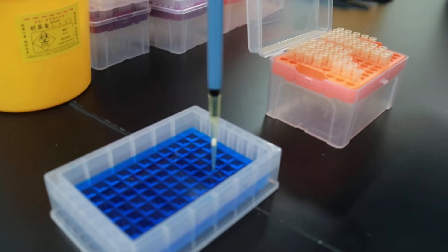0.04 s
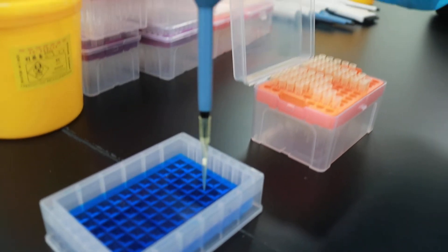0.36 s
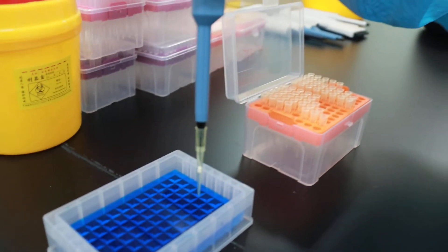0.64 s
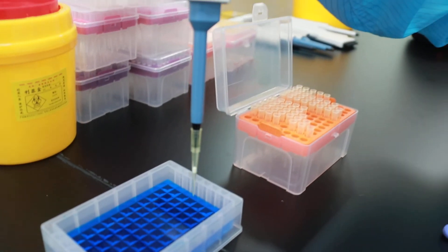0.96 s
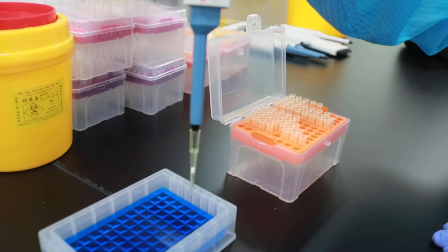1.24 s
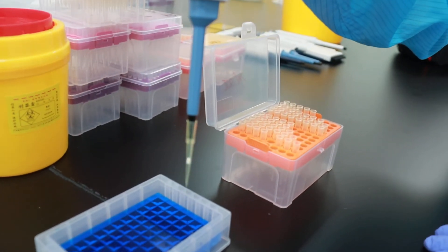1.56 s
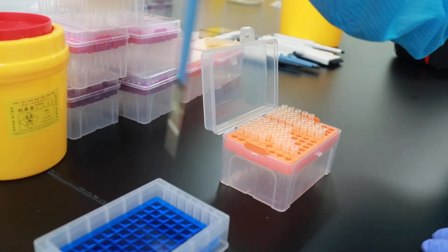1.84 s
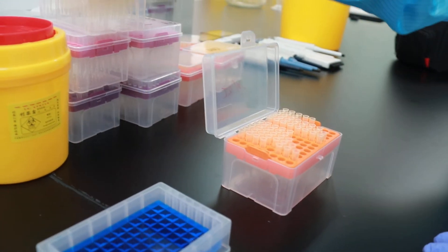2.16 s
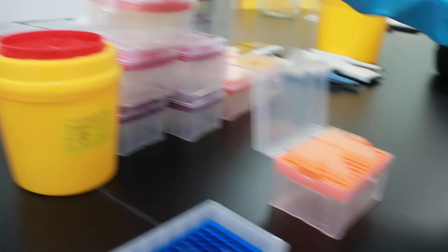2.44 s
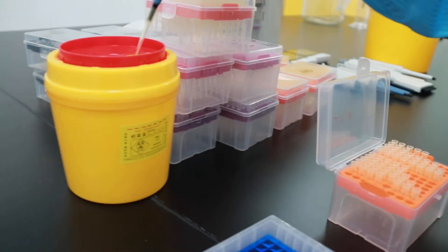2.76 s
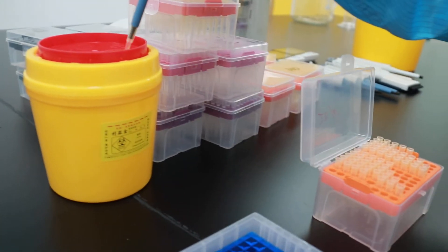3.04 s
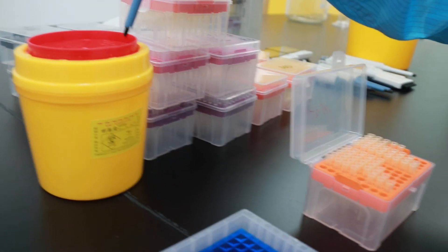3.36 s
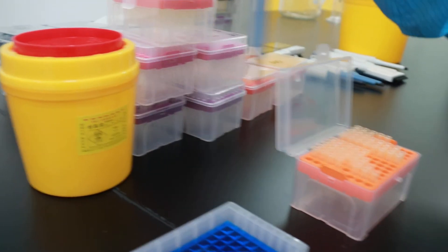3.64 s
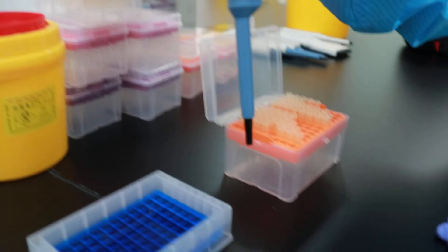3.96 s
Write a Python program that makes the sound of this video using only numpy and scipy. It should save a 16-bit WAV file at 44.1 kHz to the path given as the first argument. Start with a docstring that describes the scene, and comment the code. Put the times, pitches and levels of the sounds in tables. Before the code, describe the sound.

A pipette clicks and taps, then snaps its tip off sharply over a ventilation hum.

```python
"""Ventilation hums in a quiet lab; a small mechanism, probably a lens, ticks, then rattles in steps.
A sleeve brushes along and a pipette is worked close by: the plunger springs back,
the tip taps the rim of a plastic bin, then the ejector snaps down and back, so hard that
the limiter ducks the room and holds its echo up."""
import sys
import numpy as np
from scipy import signal
from scipy.fft import rfft, irfft
from scipy.io import wavfile
from scipy.ndimage import uniform_filter1d

SR = 44100
rng = np.random.default_rng(int(sys.argv[2]) if len(sys.argv) > 2 else 0)


def store_wav(level_fs):
    """Save 16-bit WAV to argv[1]."""
    pcm = np.round(np.clip(np.atleast_2d(level_fs), -1, 1) * 32767)
    wavfile.write(sys.argv[1], SR, pcm.T.astype(np.int16))


N = 176400


def amp(db):
    """Decibels to gain."""
    return 10 ** (np.asarray(db) / 20)


def unit(x):
    """Scale to rms 1."""
    return x / np.sqrt(np.mean(x ** 2) + 1e-20)


def read(table, hz, column=1):
    """Interpolate a table column over log frequency."""
    rows = np.array(table, float)
    return np.interp(np.log(hz + 1), np.log(rows[:, 0] + 1), rows[:, column])


def add(mix, start_s, sound):
    """Mix a sound into one channel."""
    part = mix[max(round(start_s * SR), 0):][:len(sound)]
    part += sound[:len(part)]


def place(x, left_db):
    """Pan; left_db is left minus right."""
    return x * amp([[left_db / 2], [-left_db / 2]])


def coloured(x, colour, size=2048):
    """Minimum-phase filter; colour rows: freq_hz, gain_db."""
    hz = abs(np.fft.fftfreq(size, 1 / SR))
    log_gain = np.log(amp(np.maximum(read(colour, hz), -90)))
    impulse = np.fft.ifft(np.exp(np.conj(signal.hilbert(log_gain)))).real
    return signal.fftconvolve(x, impulse[:size // 2])


def noise(colour):
    """Two independent channels of coloured noise, rms 1."""
    gain = amp(read(colour, np.fft.rfftfreq(N, 1 / SR)))
    return unit(irfft(rfft(rng.standard_normal((2, N))) * gain, N))


def crack(t60_s, size=1024, passes=4):
    """Contact: a dense, fast-decaying burst with an even spectrum and energy 1."""
    fade = amp(-60 * np.arange(size) / SR / t60_s)
    burst = rng.standard_normal(size) * fade
    for _ in range(passes):
        whitened = irfft(np.exp(1j * np.angle(rfft(burst))))
        burst = whitened * np.minimum(1, 10 * fade)
    return burst / np.linalg.norm(burst)


def ventilation():
    """Air rumble and wavering fan hum, alike in both ears, under uncorrelated hiss."""
    # freq_hz, gain_db
    colour = [(15, -36), (25, -8.5), (44, -6), (66, -8.5), (96, -2), (169, -4), (198, -7), (289, -6),
              (322, -9), (349, -3), (378, -9.5), (421, -6.5), (537, -16), (1300, -22), (1900, -28.5),
              (2560, -27), (4870, -35.5), (10600, -33), (15500, -44)]
    # freq_hz, left_right_coherence
    coherence = [(60, 0.99), (130, 0.93), (290, 0.87), (640, 0.6), (1410, 0.053), (3100, 0.072)]
    # pitch_hz, level_db, width_hz
    fan_bands = [(48.7, -65, 3.3), (96.7, -53.5, 7.5), (355, -58, 43)]
    wash_db, swell_db = -46, 1.2
    hz = np.fft.rfftfreq(N, 1 / SR)
    left, apart = rfft(noise(colour))
    same = np.clip(read(coherence, hz), -1, 1)
    right = same * left + np.sqrt(1 - same ** 2) * apart
    wash = irfft(np.array([left, right]), N)
    swell = unit(irfft(rfft(rng.standard_normal(N)) * np.exp(-hz / 5), N))
    hum = np.zeros(N)
    for pitch_hz, level_db, width_hz in fan_bands:
        peak = 1 / (1 + (2 * (hz - pitch_hz) / width_hz) ** 2)
        hum += amp(level_db) * unit(irfft(rfft(rng.standard_normal(N)) * peak, N))
    return place(wash * amp(wash_db + swell_db * swell) + hum, left_db=-1.16)


def focus_ticks():
    """Tiny uneven ticks in one broad resonance over a faint whir, probably a focus drive."""
    # time_s, relative_db
    ticks = [(0.1563, -36.5), (0.167, -37), (0.1778, -43), (0.196, -39), (0.214, -39), (0.2328, -37.5),
             (0.254, -36), (0.272, -38), (0.2897, -34), (0.3103, -40), (0.3353, -36), (0.3611, -39),
             (0.3925, -35.5), (0.4195, -35.5), (0.4541, -35.5), (0.4748, -40), (0.4873, -37), (0.499, -42),
             (0.5102, -37.5), (0.522, -36.5)]
    # freq_hz, gain_db
    resonance = [(300, -42), (1300, -11.5), (1850, -1), (2300, 2), (2800, -1), (3250, -17.5), (5000, -21),
                 (15000, -28)]
    gain_db, ring_db, lag_s = 24, -13, 0.00103
    whir_db, whir_start_s, whir_end_s = -60, 0.097, 0.543
    out, t = np.zeros((2, N)), np.arange(N) / SR
    for time_s, relative_db in ticks:
        contact = crack(t60_s=0.0039) + amp(ring_db) * crack(t60_s=0.02)
        tick = amp(relative_db + gain_db) * coloured(contact, resonance)
        for side in out:
            add(side, time_s + lag_s, tick)
    running = uniform_filter1d(1. * (t > whir_start_s) * (t < whir_end_s), size=1500)
    whir = amp(whir_db) * running * noise(resonance)
    return place(out + whir, left_db=-5.5)


def lens_steps():
    """Each step: two clicks and a grainy rasp that starts bright, dulls, weakens and stops short."""
    # start_s, first_click_db, gap_s, second_click_db, rasp_db, length_s
    steps = [(1.076, -7, 0.0097, -4, -21.5, 0.073), (1.1948, -5.5, 0.012, -3, -21, 0.075),
             (1.316, 3.5, 0.0085, -3.5, -20.5, 0.063), (3.714, -17, 0.013, 4, -20.5, 0.098),
             (3.837, 2.5, 0.0091, -13, -19, 0.075)]
    # freq_hz, gain_db
    dull = [(100, -25), (300, 1.5), (700, -7.5), (1060, -6), (1250, -7.5), (1530, -3.5), (1850, -7.5),
            (2180, -10), (2500, -7.5), (2800, 0), (3100, -2), (3500, -15.5), (4100, -13), (4900, -23.5),
            (5900, -20.5), (8800, -24), (13000, -37), (15400, -23)]
    # freq_hz, gain_db
    bright = [(200, -18), (1300, -16), (2900, -6.5), (3700, -10), (5800, -8.5), (11000, -21), (15000, -37)]
    rise_s, fade_s, sustain, grain_db, bright_db = 0.0059, 0.017, 0.12, 2.5, -13
    out = np.zeros((2, N))
    for start_s, first_db, gap_s, second_db, rasp_db, length_s in steps:
        shared, lumps, *per_side = rng.standard_normal((4, SR // 8))[:, :int(length_s * SR)]
        t = np.arange(len(shared)) / SR
        fade = np.exp(-t / fade_s)
        grain = unit(uniform_filter1d(lumps, size=90))
        level = amp(rasp_db + grain_db * grain) * np.minimum(t / rise_s, 1)
        first_click = amp(first_db) * coloured(crack(t60_s=0.0099), bright)
        second_click = amp(second_db) * coloured(crack(t60_s=0.012), dull)
        for side, apart in zip(out, per_side):
            rasp = level * unit(shared + apart)
            add(side, start_s, first_click)
            add(side, start_s + gap_s, second_click)
            add(side, start_s, coloured(rasp * (sustain + fade), dull))
            add(side, start_s, amp(bright_db) * coloured(rasp * fade, bright))
    return place(out, left_db=-3.5)


def sleeve():
    """Cloth rubs grainily as the arm moves to the bin."""
    # time_s, hiss_db, body_db
    envelope = [(1.85, -68.5, -73), (2.0, -59, -56.5), (2.28, -53, -50), (2.34, -60, -59),
                (2.41, -49, -45.5), (2.488, -59, -60), (2.535, -47.5, -55), (2.6, -58.5, -65),
                (2.67, -55, -55), (2.72, -64, -75), (2.81, -63, -64), (2.85, -48.5, -52.5),
                (2.93, -64, -56), (3.02, -60.5, -90), (3.2, -63.5, -67), (4.0, -64, -63.5)]
    # freq_hz, gain_db
    hiss_colour = [(2000, -8.5), (4500, -5.5), (6500, 1), (10000, 0), (12000, -9), (15000, -9)]
    # freq_hz, gain_db
    body_colour = [(300, -16), (900, -2.5), (2200, -3), (3500, -5.5), (6000, -32)]
    time_s, hiss_db, body_db = np.transpose(envelope)
    t = np.arange(N) / SR
    grain_db = unit(uniform_filter1d(rng.standard_normal(N), size=120))
    hiss = noise(hiss_colour) * amp(np.interp(t, time_s, hiss_db))
    body = noise(body_colour) * amp(np.interp(t, time_s, body_db))
    return place((hiss + body) * amp(grain_db), left_db=-5.5)


def plastic_taps():
    """Light, briefly ringing contacts of the pipette; the last two are clicks of the lens mechanism."""
    # freq_hz
    bands_hz = [1260, 2570, 3840, 6750, 9940]
    # start_s, then level_db at each of bands_hz
    taps = [(2.2915, -3.5, 4.5, -10.5, -17, -22), (2.632, -9, -7, -9, -39, -31),
            (2.6775, -9.5, -11.5, -19, -16.5, -19.5), (2.823, -13.5, 2.5, -6.5, -11, -22),
            (2.841, -7.5, -18, -4, -10, -15), (2.895, -6.5, -1.5, -15, -34, -19),
            (2.9008, -12, -4, 0.5, -4, -3.5), (2.941, -14, 3, -7.5, -16, -18),
            (2.9908, -12, -17, -28, -40, -44), (3.3471, 7, 2.5, -11, -3, -6),
            (3.4166, -5, -15, -11, -20, -2), (3.4301, -24, 8, -3, -18, -5), (3.439, 6.5, 19.5, 12, -2, 0),
            (3.7167, -7, 5, -0.5, -9.5, -5), (3.7254, 2.5, 3, 0.5, -4.5, -6.5)]
    # thin plastic: pitch_hz, level_db, t60_s
    modes = [(1893, -25, 0.023), (2500, -24, 0.016), (3720, -12.5, 0.017)]
    out, t = np.zeros((2, N)), np.arange(1024) / SR
    ring = sum(amp(db - 60 * t / t60_s) * np.sin(2 * np.pi * hz * t) for hz, db, t60_s in modes)
    for start_s, *levels_db in taps:
        colour = [(300, levels_db[0] - 7), *zip(bands_hz, levels_db), (15000, levels_db[-1] - 13)]
        shared = crack(t60_s=0.0123) + 0.2 * ring
        for side in out:
            contact = 0.68 * shared + 0.75 * crack(t60_s=0.0182)
            add(side, start_s, coloured(contact, colour))
    return place(out, left_db=-3.5)


def pipette_snaps():
    """A sprung part slides, hits its stop and rings the body. Returns direct sound and room send."""
    # start_s, blow_db, ring_relative_db, slide_s, slide_db, left_db, send_db
    snaps = [(2.3919, 12.5, -14.5, 0.03, -37, -3, 4), (3.2212, 29.5, -14, 0.0021, -6.5, -3, 29.5),
             (3.4357, 19, -8, .012, -17.5, -5.5, 16)]
    # freq_hz, gain_db
    plunger_release = [(250, -26), (650, -7), (1250, -1), (2000, -2), (3400, -14.5), (4400, -7.5),
                       (5400, -13), (6250, -4.5), (7800, -22), (8700, 0.5), (9700, -8), (11100, -14),
                       (15000, -10)]
    # freq_hz, gain_db
    ejector_blow = [(250, -19), (700, -7), (1200, -8), (1950, -10.5), (2750, 2.5), (3700, -6), (5200, -5.5),
                    (6350, -0.5), (6950, -1.5), (7850, 1.5), (8900, -3), (12000, -17.5), (15000, -16)]
    # freq_hz, gain_db
    ejector_return = [(150, -62), (250, -17), (858, -31), (1290, 1), (1790, -11), (2160, 3), (2700, -4),
                      (3320, 2), (4840, -5), (5460, -24.5), (6260, 0.5), (7060, -17), (7690, -1),
                      (9280, -1), (11600, -18), (13500, -8), (15000, -11)]
    # freq_hz, gain_db
    slide_colour = [(500, -16.5), (2700, -2.5), (6000, -4.5), (9000, -7), (15000, -25)]
    # freq_hz, gain_db
    send_colour = [(100, -36), (250, -13.5), (700, -8), (1400, -7), (2700, 0.5), (4800, -1.5), (6200, 3),
                   (9500, -0.5), (12000, -6.5), (15000, -11.5)]
    # pitch_hz, level_db, t60_s
    body_modes = [(2255, 8, 0.037), (2815, 12, 0.019), (3090, 11, 0.028), (3700, -2, 0.044),
                  (4300, -7, 0.14), (6150, -6, 0.048), (6100, -8, .03), (7600, -3, 0.034), (8400, -11, .05),
                  (9400, -15, .04)]
    # freq_hz, left_right_coherence
    coherence = [(500, 0.97), (3000, 0.85), (6000, 1), (9000, 0.32), (13000, 0)]
    blow_t60_s = 0.0106
    direct, send, t = np.zeros((2, N)), np.zeros(N), np.arange(SR // 8) / SR
    same = np.clip(read(coherence, np.fft.rfftfreq(1024, 1 / SR)), 0, 1)
    for snap, colour in zip(snaps, [plunger_release, ejector_blow, ejector_return]):
        start_s, blow_db, ring_relative_db, slide_s, slide_db, left_db, send_db = snap
        right = crack(blow_t60_s)
        left = irfft(same * rfft(right) + np.sqrt(1 - same ** 2) * rfft(crack(blow_t60_s)))
        ring = sum(amp(db - 60 * t / t60_s) * np.sin(2 * np.pi * (hz * t + rng.random()))
                   for hz, db, t60_s in body_modes)
        ring *= amp(blow_db + ring_relative_db) / np.linalg.norm(ring) / 2
        for side, blow, pan in zip(direct, [left, right], amp([left_db / 2, -left_db / 2])):
            slide = rng.standard_normal(len(t))[:int(slide_s * SR)]
            slide *= np.linspace(0.8, 2, len(slide))
            add(side, start_s - slide_s, pan * amp(slide_db) * coloured(slide, slide_colour))
            add(side, start_s, pan * amp(blow_db) * coloured(blow, colour))
            add(side, start_s, pan * ring)
        add(send, start_s, amp(send_db) * coloured(crack(t60_s=0.0041), send_colour))
    return direct, send


def near(x):
    """Close sounds come from the right: the left side is shaded around 7-11 kHz."""
    # freq_hz, left_minus_right_db
    shading = [(600, 2), (2200, -1), (4000, 1), (8500, -5.5), (10500, -7), (12500, 1.5)]
    left = coloured(x[0], [(hz, db / 2) for hz, db in shading])
    right = coloured(x[1], [(hz, -db / 2) for hz, db in shading])
    return np.array([left[:N], right[:N]])


def room(x):
    """Early reflections off bench and boxes, then the diffuse tail of a hard room."""
    # freq_hz, t60_s, level_db
    decay = [(148, 0.49, -8), (600, 0.62, -8), (2700, 0.61, -12.5), (6500, 0.66, -13), (10100, 0.62, -12),
             (15000, 0.38, -11)]
    tail_rise_s, early_delay_s, early_t60_s, early_db = 0.0085, 0.002, 0.069, -14
    hz, frame_s, spectra = signal.stft(rng.standard_normal((2, SR)), SR, nperseg=256)
    t60_s, level_db = read(decay, hz)[:, None], read(decay, hz, column=2)[:, None]
    energy_norm = np.sqrt(np.log(1e6) / t60_s / SR)
    spectra *= amp(level_db - 60 * frame_s / t60_s) * energy_norm
    t = np.arange(SR) / SR
    tail = signal.istft(spectra, SR, nperseg=256)[1][:, :SR] * np.minimum(t / tail_rise_s, 1)
    early = rng.standard_normal((2, SR)) * (rng.random((2, SR)) < 0.05)
    early *= amp(-60 * t / early_t60_s) * (t > early_delay_s)
    early *= amp(early_db) / np.linalg.norm(early, axis=1, keepdims=True)
    return place(signal.fftconvolve(x, early + tail, axes=1)[:, :N], left_db=-2.5)


def scene():
    """Snaps and taps excite the room; the other layers stay dry."""
    snaps, snap_send = pipette_snaps()
    taps = plastic_taps()
    close = near(snaps + taps + lens_steps())
    return close + room(taps + snap_send) + focus_ticks() + sleeve() + ventilation()


def record(dry):
    """Fast limiter with steady recovery, soft clipping of the overshoot, then a low-pass."""
    limit_db, attack_s, recovery_db_per_s = -10, 0.0012, 95
    ceiling, cutoff_hz = 1.3, 15800
    pole = np.exp(-1 / (attack_s * SR))
    power = signal.lfilter([1 - pole], [1, -pole], (dry ** 2).mean(0))
    excess_db = np.maximum(10 * np.log10(power + 1e-12) - limit_db, 0)
    recovery_db = np.arange(N) * recovery_db_per_s / SR
    duck_db = np.maximum.accumulate(excess_db + recovery_db) - recovery_db
    gain = amp(-signal.lfilter([1 - pole], [1, -pole], duck_db))
    clipped = ceiling * np.tanh(dry * gain / ceiling)
    lowpass = signal.firwin(511, cutoff_hz, window=("kaiser", 8), fs=SR)
    return signal.oaconvolve(clipped, lowpass[None], "same")


dry = scene()
out = record(dry)
store_wav(out)
```